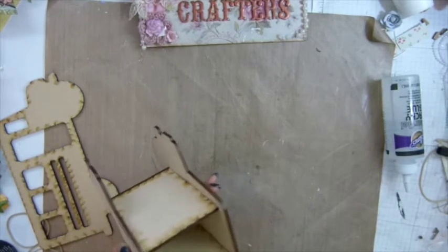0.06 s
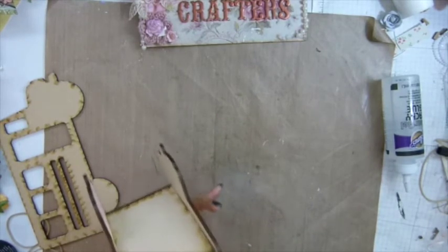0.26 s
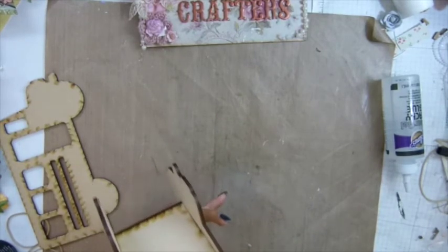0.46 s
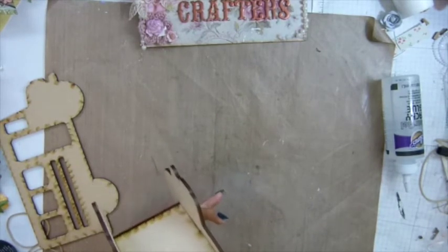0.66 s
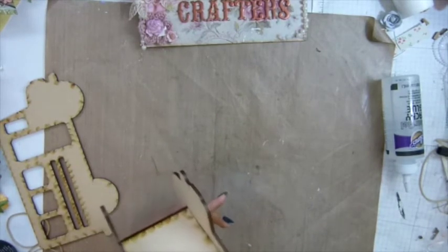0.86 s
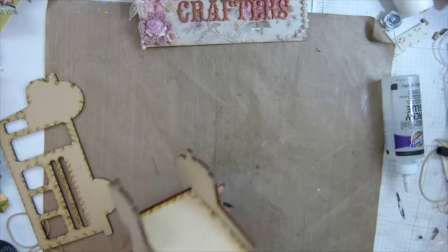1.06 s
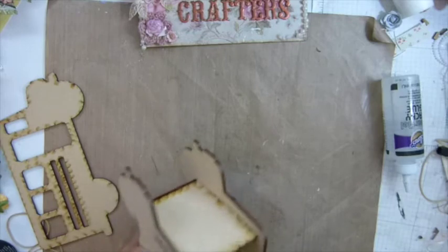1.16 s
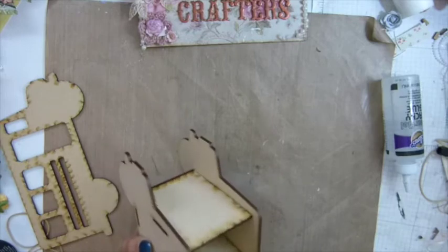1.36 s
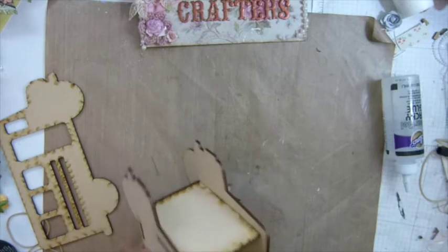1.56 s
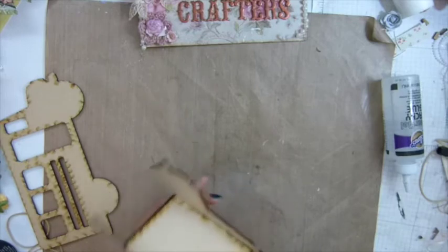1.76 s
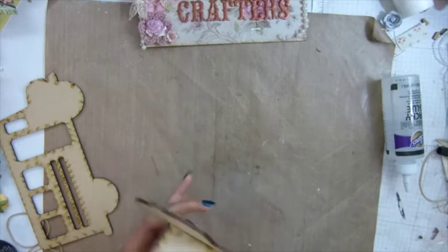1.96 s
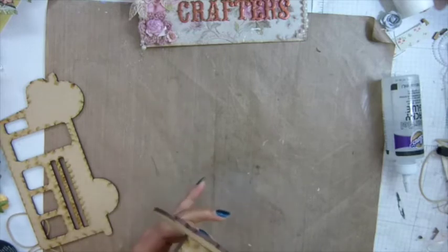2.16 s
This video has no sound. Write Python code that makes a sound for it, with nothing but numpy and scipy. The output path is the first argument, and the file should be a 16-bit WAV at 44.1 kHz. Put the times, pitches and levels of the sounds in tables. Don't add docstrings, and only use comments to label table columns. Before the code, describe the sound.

A thin tool scrapes a thin plywood box close to the microphone: a rasping stroke, a short scrape, two loud distorted snaps, another stroke, then hollow wooden knocks in a small room with faint hum and hiss.

```python
import sys
import numpy as np
from scipy import signal
from scipy.fft import rfft, irfft
from scipy.io import wavfile
from scipy.ndimage import uniform_filter1d

SR = 44100
rng = np.random.default_rng(int(sys.argv[2]) if len(sys.argv) > 2 else 0)


def amplitude_ratio(level_db):
    exponent = np.asarray(level_db, float) / 20
    return 10 ** exponent


def transcribe(u):
    v = np.clip(np.atleast_2d(u).T, -1, 1)
    q = np.round(v * 32767).astype(np.int16)
    wavfile.write(sys.argv[1], SR, q)


N = 98122

# pitch_hz, width_hz, level_db
WALLS = [(1100, 75, -3.5), (1299, 140, -10), (1642, 101, -6.5), (1873, 120, -4.5), (2102, 23, -7),
         (3320, 30, -28), (4232, 66, -7.5), (4900, 66, 0), (5470, 360, -7), (5604, 82, 2.5),
         (6420, 72, -9.5), (6974, 240, -0.5), (7344, 180, -2.5), (8390, 230, -18.5)]


def evened(x):
    return x / np.sqrt(np.mean(x ** 2) + 1e-20)


def read(points, hz):
    f, value = np.transpose(points)
    return np.interp(np.log(hz + 1), np.log(f + 1), value)


def ring(modes):
    t = np.arange(4096) / SR
    h = np.zeros(4096)
    for k, (hz, width, db) in enumerate(modes):
        decay = np.sqrt(width) * np.exp(-np.pi * width * t)
        h += amplitude_ratio(db) * decay * np.sin(2 * np.pi * hz * t + k * np.pi)
    return h / np.linalg.norm(h)


def colour(points, scale=1):
    hz = abs(np.fft.fftfreq(4096, 1 / SR))
    gain = np.log(amplitude_ratio(scale * read(points, hz)))
    return np.fft.ifft(np.exp(np.conj(signal.hilbert(gain)))).real[:2048]


def through(x, h):
    return signal.oaconvolve(x, h)[:N]


def high_pass(x, order, hz):
    return signal.lfilter(*signal.butter(order, hz, "high", fs=SR), x)


def grain():
    # pitch_hz, level_db
    spectrum = [(300, -46), (520, -34), (720, -8), (1330, -8.5), (5500, -1), (9000, -8.5), (11500, -24),
                (15500, -67.5)]
    h = colour(spectrum)
    return h / np.linalg.norm(h)


def bodies(drive):
    # pitch_hz, width_hz, level_db
    hollow = [(643, 66, -13), (714.3, 42.5, 2), (758.3, 34, 3.5), (839, 27, -2), (940, 37, -3.5)]
    # pitch_hz, width_hz, level_db
    panel = [(2188, 88, -7), (2428, 72, -2), (2584, 55, 0), (2666, 103, -9)]
    # pitch_hz, width_hz, level_db
    side_wall = [(1300, 46, 1.5), (1379, 32, 4), (1570, 33, -2)]
    # time_s, hollow_pitch_ratio, panel_pitch_ratio
    grip = [(0.0, 1.013, 0.96), (.08, 1.016, 1.1), (0.149, 1.14, 1), (.19, 0.99, 1.1), (0.216, 0.96, 1.01),
            (.3, 1, 1.01), (1.2, 1, 1), (1.33, 1.006, 1.02), (1.376, 0.99, 1.01), (1.412, .86, 1),
            (1.6, 1.04, 0.92), (1.8, 1.04, .98), (1.849, 1.044, 1.01), (1.89, 0.92, .96)]
    # time_s, pitch_ratio
    side_grip = [(.9, 1), (1.0, 1.23), (1.1, 1.05), (1.5, 1.1), (1.84, 1), (1.89, 0.95)]
    coupling_db, coupling_s, drift_ratio = 3.2, 0.035, 0.015
    t = np.arange(N) / SR
    s, hollow_ratio, panel_ratio = np.transpose(grip)
    hollow_bend, panel_bend = np.interp(t, s, hollow_ratio), np.interp(t, s, panel_ratio)
    side_bend = np.interp(t, *np.transpose(side_grip))
    parts = [(WALLS, 1), (hollow, hollow_bend), (panel, panel_bend), (side_wall, side_bend)]
    out = np.zeros(N)
    for x, (modes, bend) in zip(drive, parts):
        total = np.linalg.norm(amplitude_ratio(np.array(modes)[:, 2]))
        knots = rng.standard_normal((len(modes), 2, 300))
        for k, (hz, width, db) in enumerate(modes):
            wander, drift = (np.interp(t / coupling_s, np.arange(300), v) for v in knots[k])
            cycles = np.cumsum(hz * bend * (1 + drift_ratio * drift)) / SR
            turn = np.exp(2j * np.pi * cycles)
            r = np.exp(-np.pi * width / SR)
            push = x * amplitude_ratio(coupling_db * wander) / turn
            mode = (turn * signal.lfilter([np.sqrt(2 * (1 - r * r))], [1, -r], push)).imag
            out += (-1) ** k * amplitude_ratio(db) / total * mode
    return out


def slipping():
    slips_per_s, spread_db, chatter_db, chatter_s = 6000, 1.5, 0.85, 0.0081
    size = amplitude_ratio(spread_db * np.minimum(rng.exponential(1, N), 4))
    slips = (rng.random(N) < slips_per_s / SR) * rng.choice([-1., 1.], N) * size
    chatter = evened(uniform_filter1d(rng.standard_normal(N), round(chatter_s * SR)))
    return evened(slips * amplitude_ratio(chatter_db * chatter))


def catching():
    # start_s, level_db, pitch_hz
    catches = [(0.1454, -11, 2460), (0.1655, -5.5, 2500), (0.1805, 1, 2418), (0.1864, -11.5, 2445),
               (0.1924, -6, 2476), (0.2004, -12, 2530), (0.2109, -7, 2540), (0.2157, -11, 2640),
               (0.2264, -12.5, 2560), (1.3324, -11, 2710), (1.3404, -5.5, 2540), (1.3484, -4, 2502),
               (1.3644, -14, 2490), (1.3867, -15, 2615), (1.8523, -4.5, 2536), (1.8672, -7, 2430)]
    t = np.arange(2000) / SR
    u = t / 0.0019
    caught = np.zeros(N)
    for s, db, hz in catches:
        tone = np.sin(2 * np.pi * (hz * t + rng.random()))
        caught[round(s * SR):][:2000] += amplitude_ratio(db - 2) * u * np.exp(1 - u) * tone
    return caught


def scraping():
    # time_s, pressure_db, hollow_db, panel_db, bite_db
    long_strokes = [
        [(0.0, -31, -5, -27, 1), (0.038, -20.5, -5.5, -13.5, -2.5), (0.068, -14.5, -13.5, -8.5, -2),
         (0.11, -14.5, -9.5, -6, 1.5), (0.154, -13, -28, 0, -1.5), (0.184, -11.5, -15, -1.5, -0.5),
         (0.22, -11.5, -16.5, -4.5, -1), (0.25, -22, -9, -9.5, 0)],
        [(1.17, -43.5, -1.5, -16, -1), (1.212, -28, -2.5, -11, -1), (1.264, -13, -12, -7.5, -5),
         (1.326, -12, -15.5, -7, 1.5), (1.356, -7.5, -31.5, -6.5, 2.5), (1.39, -17, -13.5, -5, -0.5),
         (1.404, -17.5, -13, -11, -1.5), (1.418, -33, -21, -2, -1)],
        [(1.755, -29.5, 5, -7, -4), (1.78, -19, -2.5, -4, -1), (1.803, -15.5, 0, -3.5, -6),
         (1.841, -8, -18.5, -13.5, 0.5), (1.869, -9.5, -28.5, -2.5, -1), (1.883, -16, -13, -2.5, -0.5),
         (1.905, -28.5, -3, -13, -3)],
    ]
    # time_s, pressure_db, hollow_db, side_wall_db, bite_db
    drags = [
        [(.576, -18.5, -13, -14, 0.5), (.59, -21.5, -17, -19, -1), (.605, -25.5, -13, -9.5, -2.5),
         (.62, -27, -30, -9, 0.5), (.636, -28.5, -4, -2, 0.5), (.665, -39, -4.5, -8, -2)],
        [(.68, -49, -1, -11, 8), (.735, -52.5, -16, -17, 14.5), (.77, -48.5, 2, -16.5, 5),
         (.793, -44.5, 8, -1, 8)],
        [(.99, -58.5, -18.5, -6.5, 13), (1.03, -55.5, -20, 3, 15.5), (1.055, -50.5, -39, 6, 12),
         (1.086, -44.5, -26, -33.5, 4.5)],
        [(1.63, -61, 7, -10, 7), (1.66, -46.5, 4.5, -14, 9), (1.697, -43, 4.5, -8, 1.5),
         (1.703, -24.5, -3.5, -43, -10.5), (1.74, -28, 2, -25, 9), (1.762, -45.5, -10, 13, -21)],
        [(1.83, -36.5, -15, 2, 8), (1.86, -33, -21.5, 14, -6.5), (1.888, -36.5, 8, 17, 6),
         (1.895, -37.5, -3.5, 7, -5.5)],
    ]
    stroke_db, grain_db, walls_db, fade_s = -0.5, -4, -4.5, 0.0016
    t = np.arange(N) / SR
    slips = slipping()
    sharp = high_pass(slips, 1, 3600)
    drive = np.zeros((4, N))
    for wall, strokes in enumerate((long_strokes, drags), start=2):
        for stroke in strokes:
            s, *curves = np.transpose(stroke)
            press, hollow, panel, bite = (amplitude_ratio(np.interp(t, s, db)) for db in curves)
            gate = np.clip(np.minimum(t - s[0], s[-1] - t) / fade_s, 0, 1)
            press = press * amplitude_ratio(stroke_db) * gate
            drive[0] += press * (slips / bite + (bite - 1 / bite) * sharp)
            drive[1] += press * hollow * slips
            drive[wall] += press * panel * slips
    wood = catching() + amplitude_ratio(grain_db) * through(drive[0], grain())
    wood += bodies(drive * amplitude_ratio([[walls_db], [0], [0], [0]]))
    return signal.sosfilt(signal.butter(8, 579, "high", fs=SR, output="sos"), wood)


def blows(rows, rattle):
    fade_db, shiver_db, shiver_s = -13, -19, 0.022
    tip, push = np.zeros(N), np.zeros(N)
    t = np.arange(len(rattle)) / SR
    for s, db, hollow_db, length in rows:
        u = t / length
        shape = amplitude_ratio(fade_db * np.minimum(u, 1)) * (u < 1)
        shape += amplitude_ratio(shiver_db) * np.exp(-t / shiver_s)
        tip[round(s * SR):][:len(u)] += rattle * np.clip(u * 8, 0, 1) * amplitude_ratio(db) * shape
        push[round(s * SR)] += amplitude_ratio(db + hollow_db + 18)
    return tip, push


def snaps():
    # start_s, level_db, hollow_db, rattle_s
    edges = [
        (0.7953, 2.5, -10.5, 0.0063),
        (1.089, 2.5, -10, 0.006),
    ]
    # pitch_hz, width_hz, level_db
    tool = [(2428, 490, 0.5), (4980, 100, 4), (5233, 360, -2), (6284, 420, 1), (6764, 190, -3),
            (3740, 350, -4.5), (1827, 193, -6.5), (8560, 900, -25), (7050, 370, -15.5)]
    # pitch_hz, width_hz, level_db
    twang = [(4950, 45, 0), (5085, 55, -1), (6385, 60, -4), (6905, 60, -5), (3725, 90, -12)]
    # pitch_hz, width_hz, level_db
    snap_hollow = [(738, 33, 0), (825, 31, 0.0018)]
    crack_db, twang_db, thump_db = -4.5, 3, -23
    tip, push = blows(edges, rng.standard_normal(3000))
    steel = through(tip, ring(tool) + amplitude_ratio(crack_db) * np.pad(grain(), (0, 2048)))
    steel = high_pass(steel, 2, 1360)
    thump = amplitude_ratio(thump_db) * ring([(370, 260, 0)])
    return steel + through(push, ring(snap_hollow) + amplitude_ratio(twang_db) * ring(twang) + thump)


def knocks():
    # start_s, level_db, hollow_db, rattle_s
    hits = [
        (1.713, -30, 12.5, 0.0036),
        (1.722, -29, 16, .003),
        (1.733, -33, 18, .003),
        (1.886, -20.5, 15, .003),
        (1.899, -24, 15.5, 0.0023),
        (1.924, -14, 11.5, 0.0073),
        (1.936, -26, 9.5, 0.0044),
    ]
    # pitch_hz, width_hz, level_db
    knock_hollow = [(723, 62, -3.5), (807, 58, 1.5), (941, 38, -2.5)]
    tick_s, tick_db, last_knock_s, thud_db = 1.579, -38, 1.91, -16.5
    rattle = rng.standard_normal(3000)
    tick = np.zeros(N)
    tick[round(tick_s * SR):][:60] = amplitude_ratio(tick_db) * rattle[:60]
    tip, push = blows(hits, rattle)
    last = push * (np.arange(N) > last_knock_s * SR)
    thud = amplitude_ratio(thud_db) * through(last, ring([(459, 16, 0)]))
    wood = through(tip, grain() + ring(WALLS)[:2048]) + through(push, ring(knock_hollow))
    return through(tick, ring([(7950, 1800, 0)])) + thud + wood


def room(x):
    # pitch_hz, t60_s
    decay = [(400, 0.4), (1000, 0.23), (3000, 0.25), (8000, 0.29), (14000, 0.18)]
    gap_s, turns_per_s = 0.004, 7
    taps = np.zeros((3, 2, SR // 2))
    jitter = rng.integers(0, 20, (3, 2, (SR // 2 - 1) // 20))
    at = np.arange(0, SR // 2 - 20, 20) + jitter
    np.put_along_axis(taps, at, rng.choice([-1., 1.], at.shape), 2)
    hz, t, z = signal.stft(taps, SR, nperseg=256)
    fall = amplitude_ratio(-60 * t / read(decay, hz)[:, None])
    tail = signal.istft(z * fall, SR, nperseg=256)[1]
    level = np.linalg.norm(tail[0, 0])
    tail = np.pad(tail, ((0, 0), (0, 0), (round(gap_s * SR), 0))) / level
    phase = np.arange(N) * turns_per_s / SR + np.arange(3)[:, None] / 3
    turn = np.sqrt(2 / 3) * np.cos(2 * np.pi * phase)
    return signal.fftconvolve((x * turn)[:, None], tail, axes=2).sum(0)[:, :N]


def air():
    # pitch_hz, correlation
    likeness = [(60, 1), (380, -0.57), (2380, 0.57), (15000, 0.47)]
    # pitch_hz, level_db
    spectrum = [(30, -9), (70, -15.5), (120, -3.5), (300, -7.5), (800, -10.5), (6500, -22.5), (10000, -23),
                (15500, -32)]
    # pitch_hz, width_hz, level_db
    hums = [(117, 12, -59.5), (144, 3.6, -67)]
    hz = np.fft.rfftfreq(N, 1 / SR)
    a, b = rfft(rng.standard_normal((2, N)))
    same = np.clip(read(likeness, hz), 0, 1)
    z = np.array([a, same * a + np.sqrt(1 - same ** 2) * b])
    out = amplitude_ratio(-48) * evened(irfft(z * amplitude_ratio(read(spectrum, hz)) * (hz > 20), N))
    for f, width, db in hums:
        out += amplitude_ratio(db) * evened(irfft(a / (1 + (2 * (hz - f) / width) ** 2), N))
    return out


def scene():
    # pitch_hz, level_db
    wide = [(60, 3.5), (240, -3.5), (650, -9), (1300, -10), (3770, -16), (9000, -5.5), (15000, 0)]
    # pitch_hz, level_db
    lean = [(240, 8), (950, 2.5), (15000, -2.5)]
    # pitch_hz, level_db
    to_room = [(460, -3), (800, -2), (1700, -0.5), (2550, -2.5), (3400, 4), (5000, 1), (5600, -1.5)]
    port_s, room_db, same = 0.005, -11, 0.32
    box = scraping() + high_pass(snaps() + knocks(), 2, 230)
    spread = rng.standard_normal(1000) * np.exp(-np.arange(1000) / (port_s * SR))
    side = through(through(box, spread / np.linalg.norm(spread)), colour(wide))
    left = through(box + side, colour(lean, scale=0.4))
    right = through(box - side, colour(lean, scale=-0.58))
    wet = room(through(box, colour(to_room)))
    wet = (wet + same * wet[::-1]) / np.sqrt(1 + same ** 2)
    return np.array([left, right]) + amplitude_ratio(room_db) * wet + air()


def top_cut(x):
    return signal.sosfilt(signal.butter(12, 15690, fs=SR, output="sos"), x)


def record(dry):
    # pitch_hz, level_db (per Hz)
    mask = [(500, -70), (650, -100), (8000, -94), (10000, -73.5), (15000, -57)]
    hz, t, z = signal.stft(dry, SR, nperseg=1024)
    power = (abs(z) ** 2).mean(0)
    band = uniform_filter1d(power, size=5, axis=0) / hz[1] + 1e-20
    margin_db = 10 * np.log10(band / (power.sum(0) + 1e-20)) - read(mask, hz)[:, None]
    flicker = np.repeat(rng.standard_normal((len(t), 33)), 16, axis=1).T[:len(hz)]
    margin_db += 10.0 * flicker * (hz > 9000)[:, None]
    kept = signal.istft(z * np.clip(0.5 + margin_db / 3, 0, 1), SR, nperseg=1024)[1][:, :N]
    return top_cut(np.clip(kept - 0.012, -1.0, 1.0))


dry = scene()
out = record(dry)
transcribe(out)
```